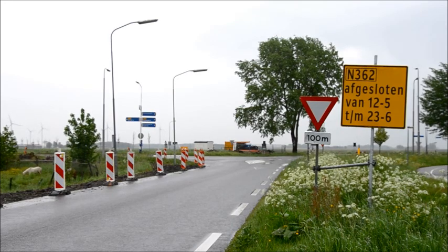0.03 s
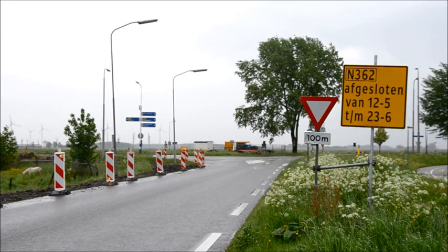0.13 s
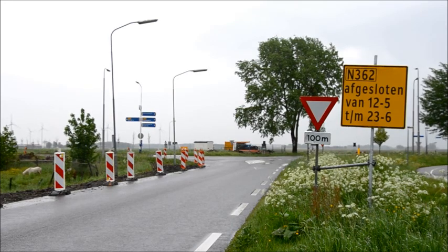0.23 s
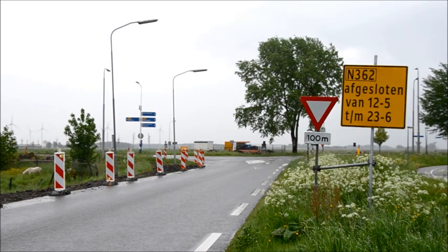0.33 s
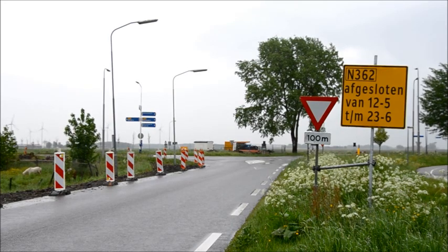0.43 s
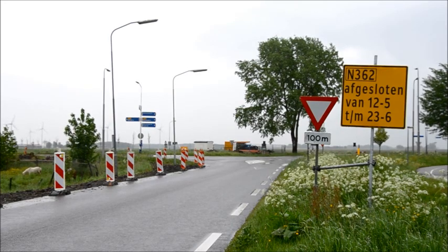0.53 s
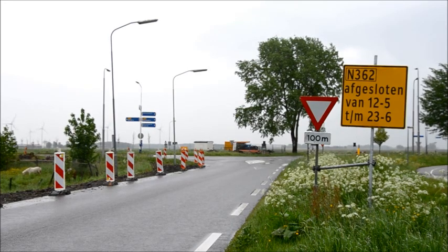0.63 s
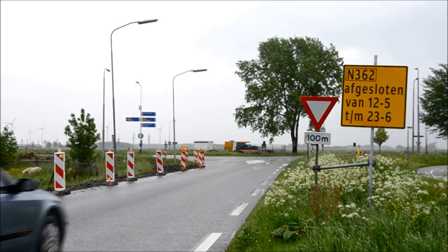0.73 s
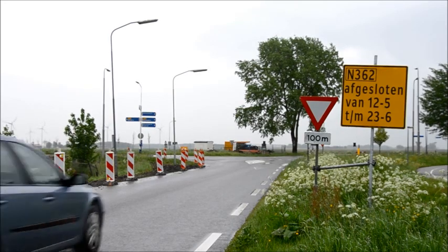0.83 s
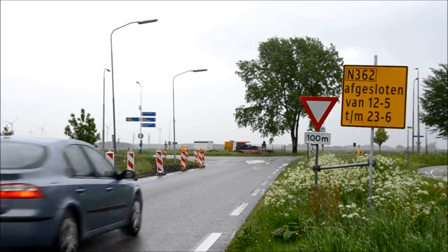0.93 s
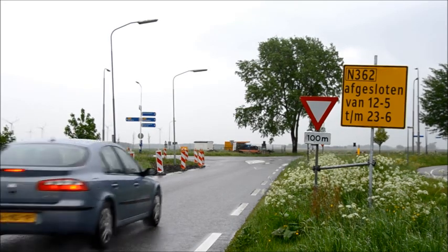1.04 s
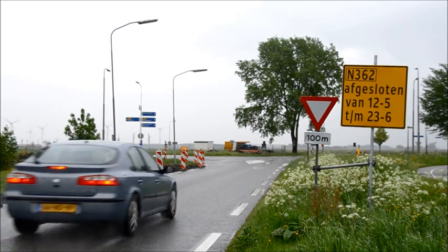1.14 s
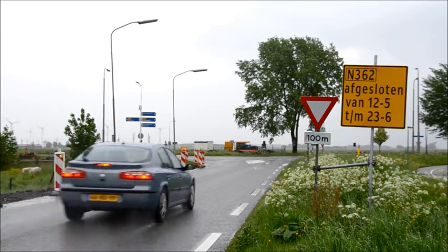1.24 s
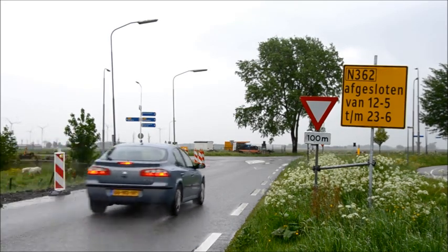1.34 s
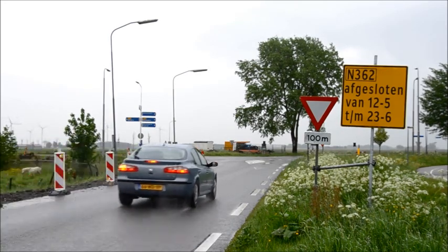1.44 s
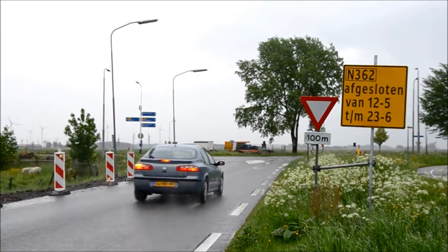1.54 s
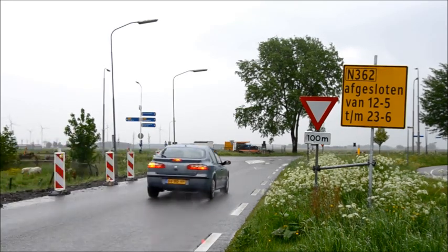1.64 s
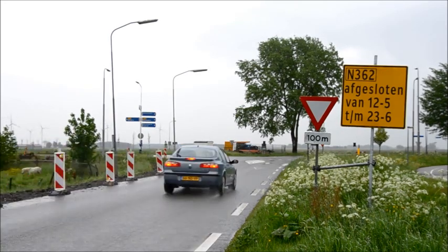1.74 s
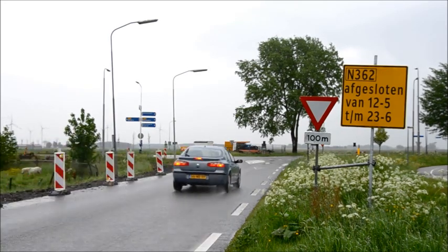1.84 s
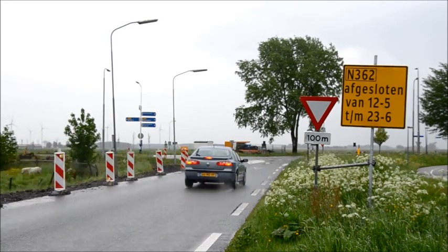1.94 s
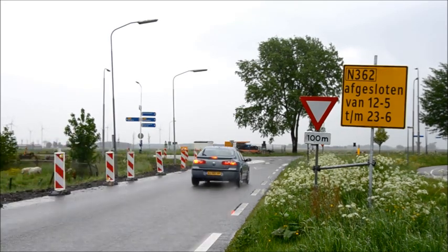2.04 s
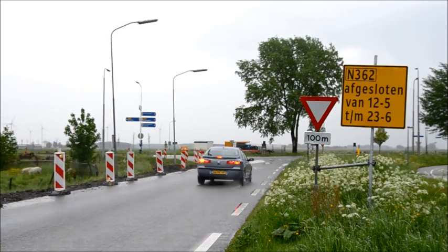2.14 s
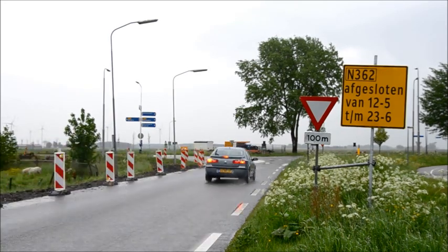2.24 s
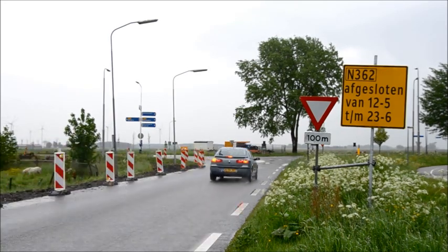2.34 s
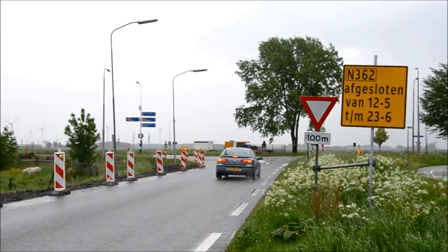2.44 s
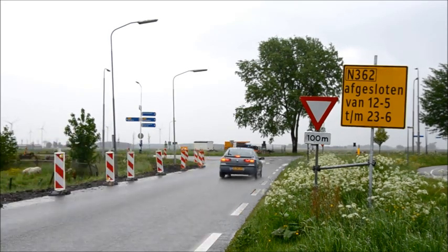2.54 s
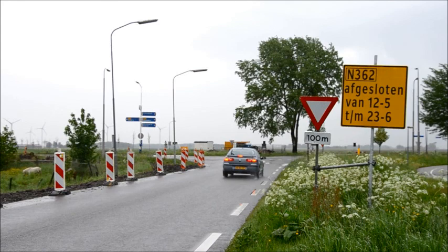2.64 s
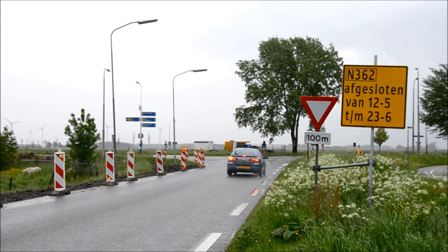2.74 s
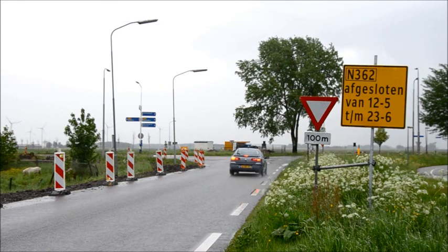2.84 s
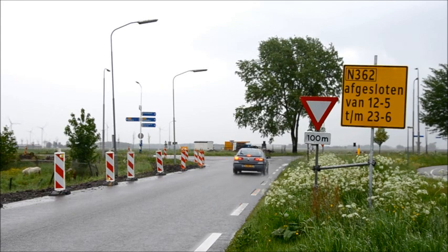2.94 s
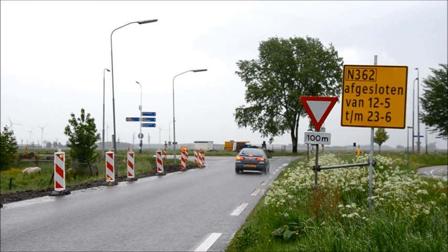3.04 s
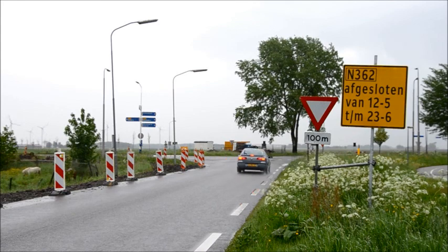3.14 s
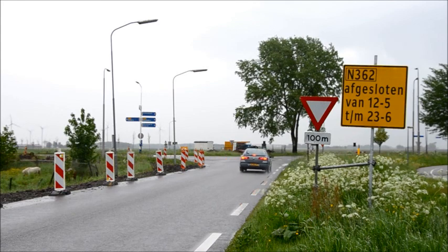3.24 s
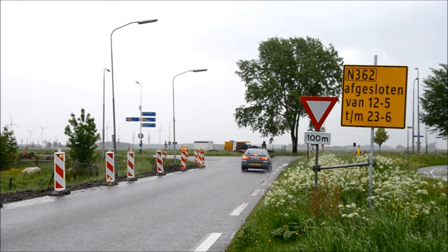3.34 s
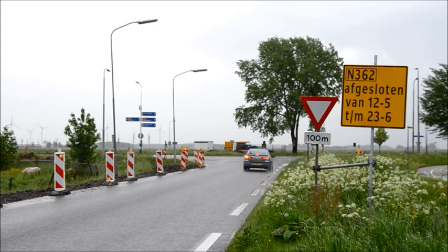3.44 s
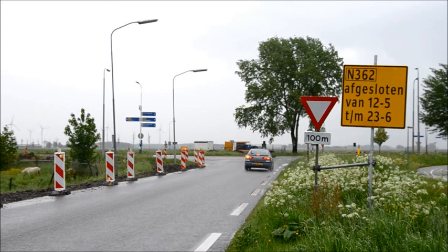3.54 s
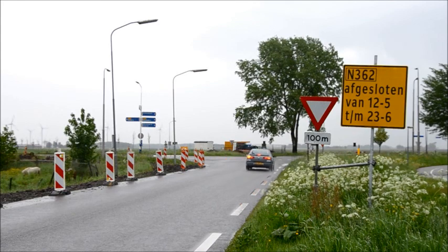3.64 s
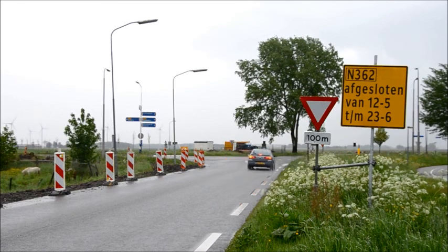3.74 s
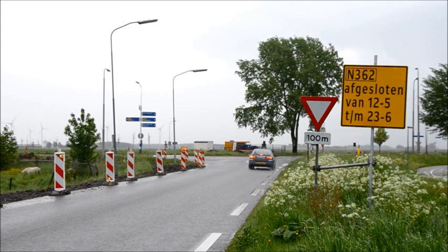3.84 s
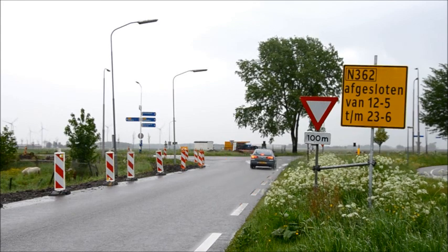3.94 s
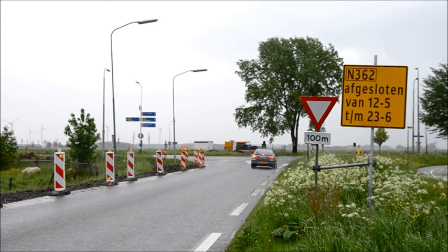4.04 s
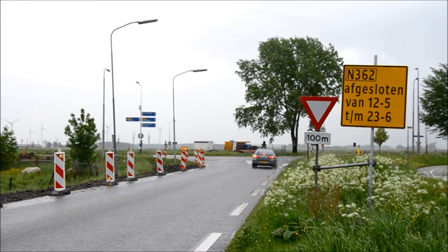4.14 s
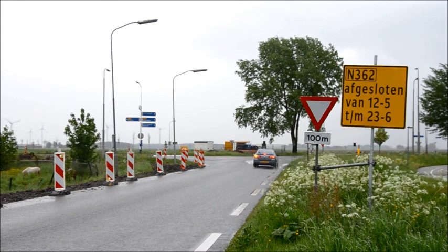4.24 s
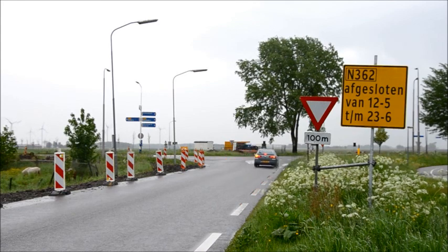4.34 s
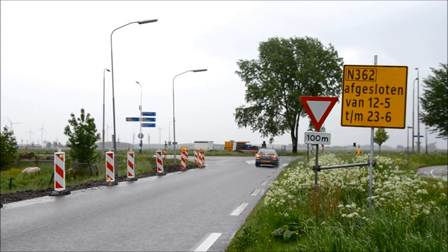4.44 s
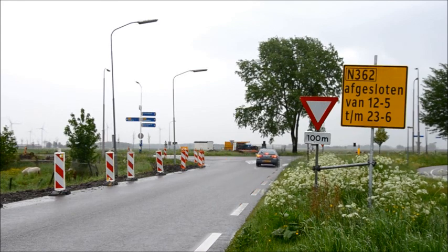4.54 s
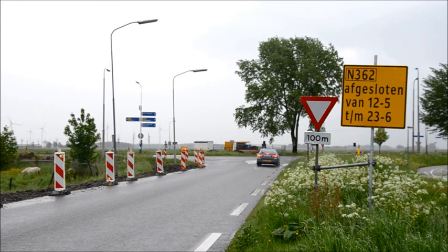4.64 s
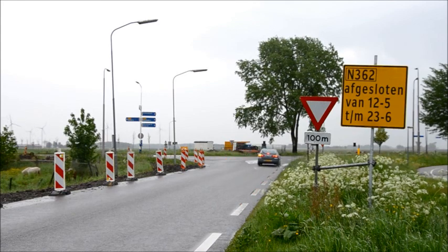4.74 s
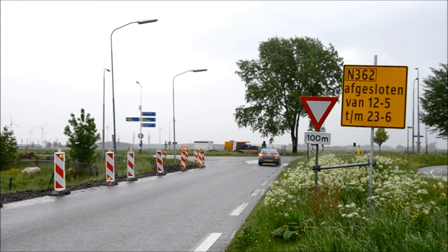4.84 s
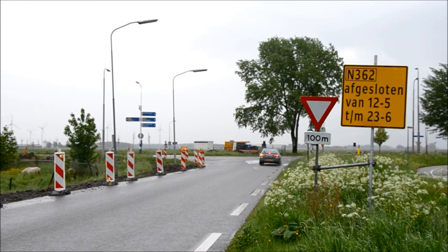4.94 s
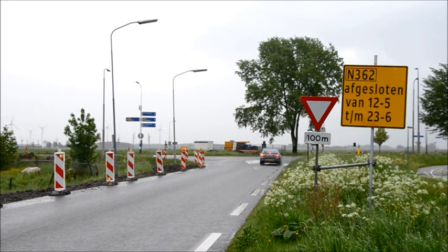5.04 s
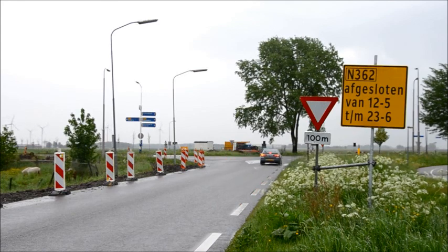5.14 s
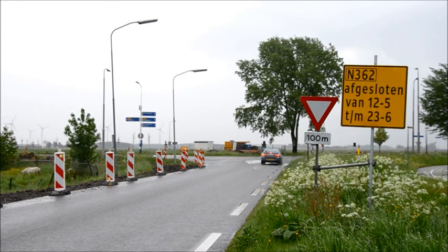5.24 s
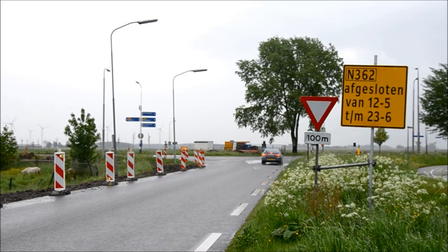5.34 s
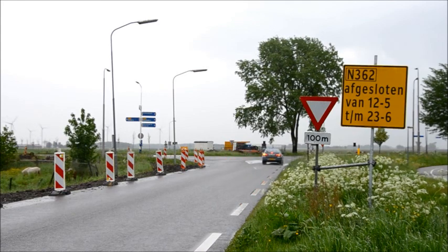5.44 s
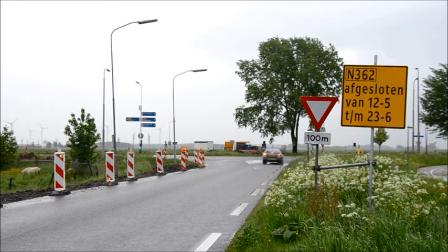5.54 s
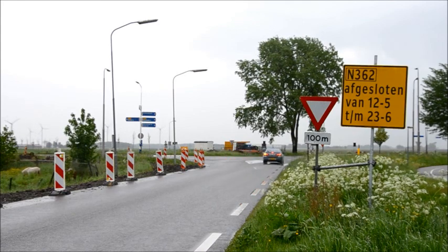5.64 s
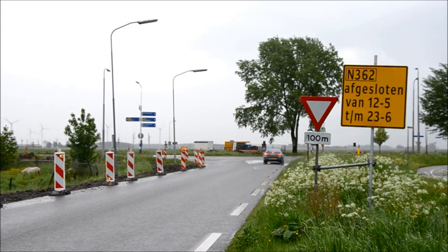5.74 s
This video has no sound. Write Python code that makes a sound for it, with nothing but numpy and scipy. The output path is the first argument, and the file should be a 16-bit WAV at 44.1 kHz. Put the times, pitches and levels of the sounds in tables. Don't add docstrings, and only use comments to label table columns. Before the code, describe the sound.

Mono, close roadside microphone in open country. A car's wet tyre noise surges quickly, crackling with thrown water, with two sharp raindrop taps near the peak. The sound turns duller and fades over several seconds, swelling slightly as the car bends away. Soft wind pushes, faint far traffic and tiny drop ticks remain, then a distant bird.

```python
import sys
import numpy as np
from scipy import signal
from scipy.fft import rfft, irfft
from scipy.io import wavfile
from scipy.ndimage import uniform_filter1d

SR = 44100
rng = np.random.default_rng(int(sys.argv[2]) if len(sys.argv) > 2 else 0)


def voltage_ratio(level):
    return 10 ** (np.asarray(level, float) / 20)


def transcribe(signal):
    frames = np.atleast_2d(signal).T
    limited = np.clip(frames, -1, 1)
    pcm = np.round(limited * 32767).astype(np.int16)
    wavfile.write(sys.argv[1], SR, pcm)


N = 255780


def evened(x):
    return x / np.sqrt(np.mean(x ** 2) + 1e-20)


def read(points, hz):
    f, value = np.transpose(points)
    return np.interp(np.log(hz + 1), np.log(f + 1), value)


def add(mix, s, sound):
    part = mix[round(s * SR):][:len(sound)]
    part += sound[:len(part)]


def bell(x, centre, width, height):
    return height * np.exp(-2 * ((x - centre) / width) ** 2)


def slope(hz, edge_hz, octaves=0.18):
    return 1 / (1 + (edge_hz / (hz + 1)) ** (2 / octaves))


def coloured(points):
    gain = voltage_ratio(read(points, np.fft.rfftfreq(N, 1 / SR)))
    return evened(irfft(rfft(rng.standard_normal(N)) * gain, N))


def whistle(db, hz, width):
    shake = signal.lfilter([1], [1, -np.exp(-np.pi * width / SR)], rng.standard_normal((2, N)))
    turn = np.exp(2j * np.pi * np.cumsum(hz * np.ones(N)) / SR)
    wander = .5 + evened(shake[0]) + 1j * evened(shake[1])
    return voltage_ratio(db) * evened((turn * wander).real)


def swell(peak, db, rise, fall, hz, glide=0.):
    since = np.arange(N) / SR - peak
    return db + np.minimum(rise * since, -fall * since), hz + glide * since


# frequency in Hz, density in dB per Hz.
RUMBLE_SPECTRUM = [(15, -46), (25, -14), (54, -5), (75, -6.5), (113, -5), (140, -6.5), (160, 0), (210, -41),
                   (350, -120)]
# peak time in s, peak level in dB, rise in dB per s, fall in dB per s, pitch in Hz.
TRAFFIC_DRONE = (2.75, -57, 40, 17, 144)
LORRY_HUM = (4.25, -67, 6.5, 32, 64.5)


def far_traffic():
    wash = voltage_ratio(-65) * coloured(RUMBLE_SPECTRUM)
    drone = whistle(*swell(*TRAFFIC_DRONE, glide=-9), width=5.3)
    lorry = whistle(*swell(*LORRY_HUM), width=8)
    return wash + drone + lorry


# time of the note in seconds, level in dB.
BIRD_NOTES = [
    (5.04, -58),
    (5.2, -62),
    (5.28, -57),
    (5.4, -59),
    (5.5, -62),
    (5.6, -59),
    (5.67, -61),
    (5.8, -55),
]


def bird():
    t = np.arange(N) / SR
    note_s, note_hz = 0.086, 3870
    power = sum(voltage_ratio(2 * db) * bell(t, s, note_s, 0.82) for s, db in BIRD_NOTES)
    return np.sqrt(power) * whistle(0, note_hz, width=300)


# start in seconds, peak level in dB.
GUSTS = [
    (2.469, -57),
    (4.099, -55),
]


def gusts():
    out, t = np.zeros(N), np.arange(3000) / SR
    push = np.sin(2 * np.pi * 48 * t) * np.hanning(len(t))
    for s, db in GUSTS:
        add(out, s, voltage_ratio(db) * push)
    return out


# start in seconds, ring level in dB, ring pitch in Hz, crack level in dB.
RAINDROPS = [(.5415, -13, 5000, -20), (.5495, -30, 6000, -24), (.690, -15, 3400, -26),
             (1.4955, -22, 2800, -28), (1.519, -24, 3000, -36), (1.654, -31, 2900, -34),
             (3.0267, -17, 3100, -30), (3.0288, -24, 2800, -55), (3.031, -30, 3000, -60),
             (3.0555, -60, 5000, -42), (3.2714, -28, 3500, -44), (3.4764, -37, 4100, -47),
             (3.5734, -35, 2800, -47), (3.706, -35, 2900, -47), (3.785, -28, 3300, -55),
             (3.871, -38, 4000, -55), (3.92, -43, 6600, -60), (3.977, -35, 2900, -58),
             (4.012, -43, 6200, -50), (4.101, -35, 2700, -60), (4.102, -55, 5800, -49),
             (4.219, -36, 3100, -53), (4.494, -38, 2800, -51), (4.672, -38, 3200, -55),
             (5.468, -43, 3900, -62), (5.515, -43, 5200, -43), (5.518, -47, 5400, -52),
             (5.557, -52, 5000, -50)]


def raindrops():
    out, t, hz_axis = np.zeros(N), np.arange(512) / SR, np.fft.rfftfreq(512, 1 / SR)
    ring_s, glide_s, crack_over_ring = .0026, .0004, 1.65
    decay = np.exp(-(t / ring_s) ** 2 * 2) * np.tanh(t / .00025)
    noises = rng.standard_normal((len(RAINDROPS), 512))
    for (s, db, hz, crack_db), noise in zip(RAINDROPS, noises):
        glide = 1.3 if db > -18 else .4
        cycles = hz * (.88 * t + glide * glide_s * (1 - np.exp(-t / glide_s)))
        tone = np.sin(2 * np.pi * cycles)
        octave_bell = np.exp(-(np.log((hz_axis + 1) / (crack_over_ring * hz)) / .7) ** 2)
        crack = evened(irfft(rfft(noise) * octave_bell))
        add(out, s, decay * (voltage_ratio(db) * tone + voltage_ratio(crack_db) * crack))
    return signal.lfilter(*signal.butter(4, 10400, fs=SR), out)


SPEED_M_S, BRAKE_M_S2, LANE_M = 15.92, 1.444, 3.955


def travel(t, closest):
    since = t - closest
    along = SPEED_M_S * since - BRAKE_M_S2 / 2 * np.maximum(since, 0) ** 2
    metres = np.hypot(along, LANE_M)
    return metres, (1 - along / metres) / 2, 20 * np.log10(LANE_M / metres)


# multiple of the firing rate, level in dB.
ENGINE_ORDERS = [(2, -10), (3, 0), (4, -3), (5, 1), (6, -1), (7, -5)]
# closest time in seconds, level when closest in dB, gain ahead of the car in dB, fade in dB per s.
ENGINE_LEVELS = [
    (.2, -46.5, -6, -9),
    (.29, -37.5, -12, -8.5),
]


def engine():
    t = np.arange(N) / SR
    lift_hz, idle_hz, lift_s = 46.5, 37.9, .7
    turns = np.cumsum(idle_hz + (lift_hz - idle_hz) * np.exp(-t / lift_s)) / SR
    levels = []
    for closest, db, front_db, fade_db in ENGINE_LEVELS:
        _, front, spread_db = travel(t, closest)
        levels.append(db + spread_db + front_db * front + fade_db * t)
    first_db, upper_db = levels
    waver = rng.standard_normal((len(ENGINE_ORDERS), N))
    waver = uniform_filter1d(uniform_filter1d(waver, 4000), 4000)
    upper = np.zeros(N)
    for (k, db), w in zip(ENGINE_ORDERS, waver):
        upper += voltage_ratio(db + .4 * k * evened(w)) * np.sin(2 * np.pi * k * turns + k * k)
    first = np.sin(2 * np.pi * turns)
    return np.sqrt(2) * (upper * voltage_ratio(upper_db) + first * voltage_ratio(first_db))


def spatter(per_s, spread_db, length):
    sizes = voltage_ratio(spread_db * np.minimum(rng.exponential(1, N), 3.2))
    kicks = sizes * (rng.random(N) < per_s / SR)
    return evened(signal.oaconvolve(kicks, np.exp(-np.arange(600) / SR / length))[:N])


def droplets(per_s, spread_db):
    size = voltage_ratio(spread_db * np.minimum(rng.exponential(1, N), 4)) * (rng.random(N) < per_s / SR)
    kind, t, out = rng.integers(0, 10, N), np.arange(200) / SR, np.zeros(N)
    for k, hz in enumerate(np.geomspace(2500, 10000, 10)):
        decay = t * hz * np.exp(-t * hz / 1.6)
        ping = np.sin(2 * np.pi * hz * t) * decay * hz / 5000
        out += signal.oaconvolve(size * (kind == k), ping)[:N]
    return evened(out)


def stretch(t, s, db, length):
    return db * np.exp(-(2 * (t - s) / length) ** 4)


def axles(t, closest):
    wheelbase_m = 2.7
    gap = wheelbase_m / SPEED_M_S / 2
    metres, front, a_db = travel(t, closest - gap)
    _, behind, b_db = travel(t, closest + gap)
    return metres, (front + behind) / 2, 10 * np.log10((voltage_ratio(2 * a_db) + voltage_ratio(2 * b_db)) / 2)


# closest time in seconds, level when closest in dB,
# gain ahead of the car in dB, air loss in dB per m, share of the wetness.
LAYERS = [
    (0.49, -16.5, -1.5, 0.0623, 0.05),
    (0.52, -18.5, -7, 0.06, 0.25),
    (0.66, -25, -9, 0.1274, 0.7),
    (0.35, -28.5, -5.5, 0.05, 0.033),
]
# gain from behind in dB, share of the bend, share of the slow unevenness.
LAYER_REAR_DB = [2, -0.9, -1.54, 3.5]
LAYER_BEND_SHARE = [0.13, 1.44, 0.1, .1]
LAYER_UNEVEN_SHARE = [0.88, 0.71, 0.19, 0.24]
# centre in seconds, extra level in dB, length in seconds.
PUDDLES = [(0.239, 8, 0.073), (0.414, 3, 0.2), (0.548, 5, 0.035), (0.663, 2.5, 0.11), (0.883, 2, 0.091),
           (1.76, 0.5, 0.18), (2.088, 4.5, 0.77), (3.127, 2.5, 0.47), (4, 0, .45), (4.904, 2, .3),
           (4.497, 1, 0.45), (0.0, -4.5, .2), (2.72, -2, 0.32)]
# centre in seconds, extra level in dB, length in seconds.
BEND = (3.81, 3.05, 1.1)
# centre in seconds, extra rumble in dB, length in seconds.
JOLT = (0.22, 5.6, 0.084)
# time in seconds, level in dB.
UNEVENNESS = [(0, -0.5), (.15, 0.2), (.3, 1), (.5, -0.9), (.65, -0.4), (.85, 1.9), (1.1, 2.1), (1.3, 2.5),
              (1.55, .8), (1.8, 1.8), (2.05, -1.2), (2.4, -0.6), (2.8, 0), (3.4, 0), (3.8, 0.1), (4.4, -0.3),
              (5, 1.5), (5.8, 0.4)]


def layer_levels(t, rear):
    wet_db, bend_db = sum(stretch(t, *p) for p in PUDDLES), stretch(t, *BEND)
    slowing = BRAKE_M_S2 / SPEED_M_S * np.maximum(t - LAYERS[0][0], 0)
    speed_db = 30.5 * np.log10(1 - slowing)
    uneven_db = np.interp(t, *np.transpose(UNEVENNESS))
    levels = []
    rows = zip(LAYERS, LAYER_REAR_DB, LAYER_BEND_SHARE, LAYER_UNEVEN_SHARE)
    for (closest, db, front_db, air_db, wet), rear_db, bend, uneven in rows:
        metres, front, spread_db = axles(t, closest)
        view_db = front_db * front ** 3.4 + rear_db * rear + bend * bend_db
        road_db = wet * wet_db + uneven * uneven_db
        levels.append(db + spread_db + view_db - air_db * metres + speed_db + road_db)
    levels[3] = levels[3] + stretch(t, *JOLT)
    metres, front, _ = travel(t, LAYERS[2][0])
    shade_db = 3 - 8.5 * front - 0.07 * metres - 0.83 * bend_db - 2.2 * rear
    return levels, shade_db


# frequency in Hz, density in dB per Hz.
ALONGSIDE_SPECTRUM = [(59, -50), (100, -38), (212, -19.5), (400, -16), (698, -9.5), (885, -0.5), (1080, -1),
                      (1640, -6), (2850, -2), (6680, -12.5), (7990, -16.5), (9360, -13), (10500, -21.5),
                      (11400, -41), (14800, -73), (22000, -120)]
BEHIND_SPECTRUM = [(100, -26), (210, -9.5), (441, -11), (620, -12), (800, 1), (1200, 5), (1500, -0.5),
                   (2050, -3.5), (2600, -3), (3100, -7), (4400, -14.5), (6000, -21.5), (8600, -25.5),
                   (11400, -47.5)]
# centre in Hz, width in Hz, depth
# in dB.
ECHO_DIPS = [(330, 140, -5), (990, 130, -2.5), (1780, 240, -4), (2320, 220, -8), (2860, 160, -5),
             (3330, 200, -2), (4130, 200, -3), (4800, 260, -4), (5600, 240, -5.5), (6300, 180, -2.5),
             (6750, 200, -3), (7300, 280, -3), (8200, 220, -3), (10050, 260, -3)]
# centre in Hz, width in Hz, depth in dB.
PORT_DIP = (7950, 450, -5.5)


def view_colour(hz, t, rear, shade_db, turn_s):
    behind_db = read(BEHIND_SPECTRUM, hz) + sum(bell(hz, *d) for d in ECHO_DIPS)
    colour_db = np.outer(read(ALONGSIDE_SPECTRUM, hz), 1 - rear) + np.outer(behind_db, rear)
    colour_db += bell(hz, *PORT_DIP)[:, None]
    colour_db += np.outer(bell(hz, 4800, 3000, 1), shade_db)
    damp_air_db = -0.08 * travel(t, turn_s)[0]
    return voltage_ratio(colour_db + np.outer(bell(hz, 8500, 3000, 1), damp_air_db))


# peak time in s, peak level in dB, rise in dB per s, fall in dB per s, pitch in Hz.
TYRE_CAVITY = (-0.12, -45, 20, 7.5, 265)


def tyres():
    air, pings = rng.standard_normal(N), droplets(per_s=500, spread_db=3.4)
    common = spatter(per_s=440, spread_db=6.5, length=0.0017)
    bursts = [0.013, 0.32, 0.34, .02]
    pings_db = [-30, -13, -13, -40]
    patchy_db = [1.0, 0.36, 1.0, 1.0]

    hz, t = np.fft.rfftfreq(1024, 1 / SR), np.arange(N // 256 + 2) * 256 / SR
    patches = uniform_filter1d(rng.standard_normal((len(t), 513)).T, 14, 0)
    patches = evened(uniform_filter1d(patches, 12, 1))

    side_view, rear_view, far_view, turn_s = .2, .78, 0.19, 1.09
    turned = (rear_view - side_view) / (1 + np.exp((turn_s - t) / .06))
    far_off = far_view / (1 + np.exp((2.95 - t) / .4))
    rear = np.clip(side_view + turned + far_off, 0, 1)
    levels, shade_db = layer_levels(t, rear)
    colour = view_colour(hz, t, rear, shade_db, turn_s)

    above = [slope(hz, edge) for edge in (600, 1800, 5000)]
    roar, spray, mist = above[0] - above[1], above[1] - above[2], above[2]
    rumble = (1 - above[0]) * slope(hz, 93, 0.27)
    field = 0
    rows = zip((roar, spray, mist, rumble), levels, bursts, pings_db, patchy_db)
    for share, level_db, burst, ping_db, patch_db in rows:
        splash = 0.69 * common + 0.22 * spatter(per_s=540, spread_db=12.0, length=0.0061)
        source = evened(air * (1 - burst + burst * splash) + voltage_ratio(ping_db) * pings)
        shape = colour * np.sqrt(share)[:, None]
        shape = shape / np.sqrt((shape ** 2).mean(0)) * voltage_ratio(level_db + patch_db * patches)
        field = field + signal.stft(source, nperseg=1024, noverlap=768)[2] * shape
    rolling = signal.istft(field, nperseg=1024, noverlap=768)[1][:N]

    body_db = np.interp(np.arange(N) / SR, t, levels[3]) - 30
    body = voltage_ratio(body_db) * coloured(RUMBLE_SPECTRUM)
    cavity = whistle(*swell(*TYRE_CAVITY, glide=-4), width=7.8)
    return rolling + body + cavity


def scene():
    return (far_traffic() + bird() + gusts() + raindrops() + engine() + tyres())[None]


def band_limit(x):
    return signal.sosfilt(signal.butter(12, 11560, fs=SR, output="sos"), x)


def record(dry):
    lowpass = signal.firwin(255, 11290, window=("kaiser", 9), fs=SR)
    mix = signal.oaconvolve(dry, lowpass[None], "same")
    return band_limit(mix)


dry = scene()
out = record(dry)
transcribe(out)
```